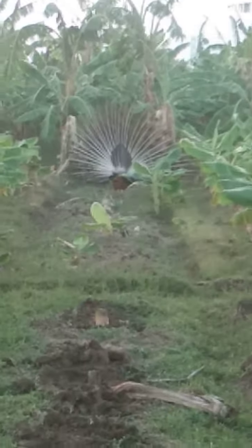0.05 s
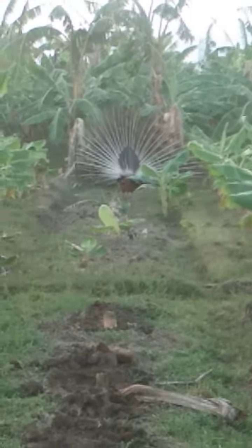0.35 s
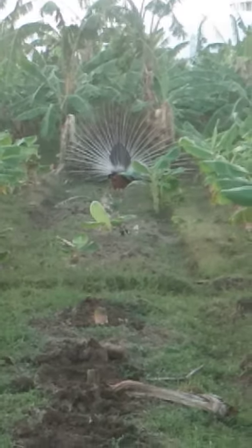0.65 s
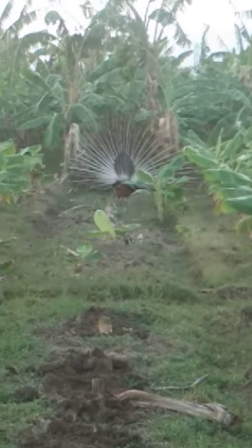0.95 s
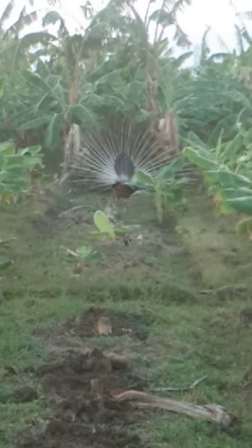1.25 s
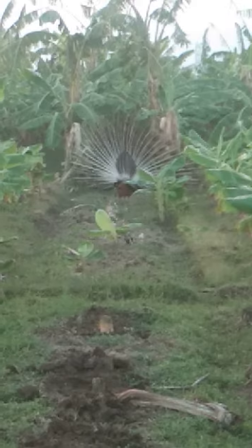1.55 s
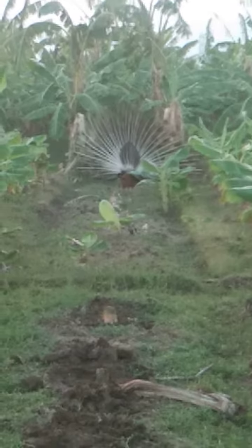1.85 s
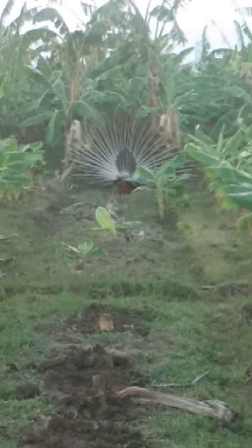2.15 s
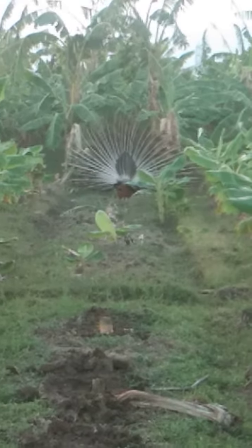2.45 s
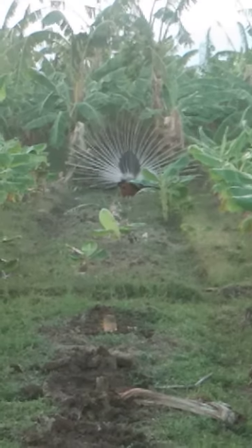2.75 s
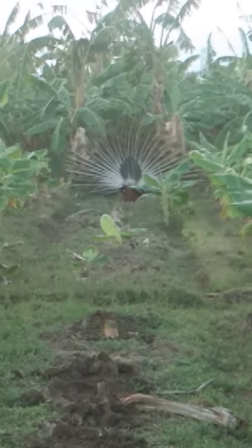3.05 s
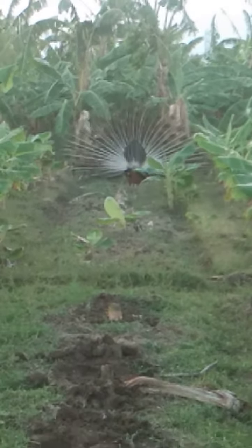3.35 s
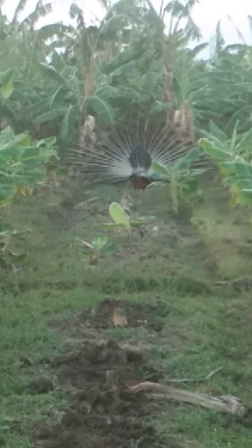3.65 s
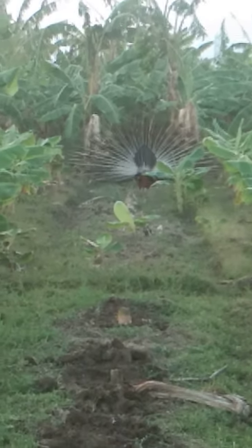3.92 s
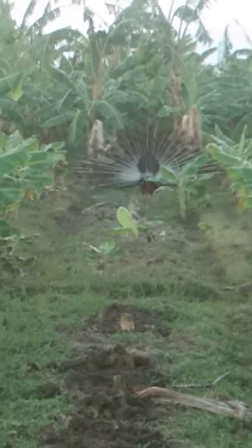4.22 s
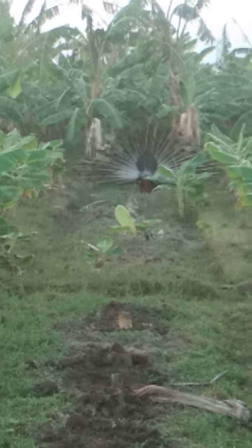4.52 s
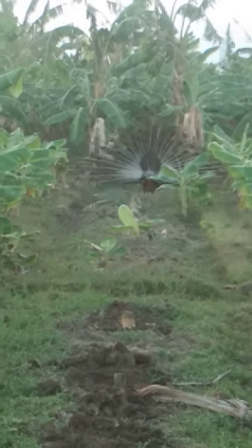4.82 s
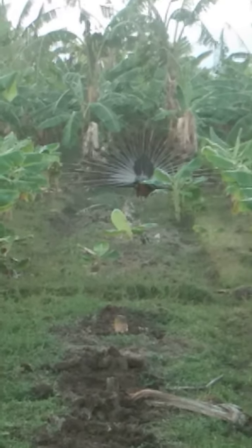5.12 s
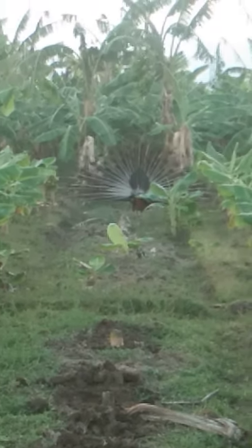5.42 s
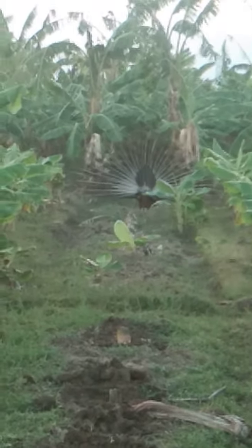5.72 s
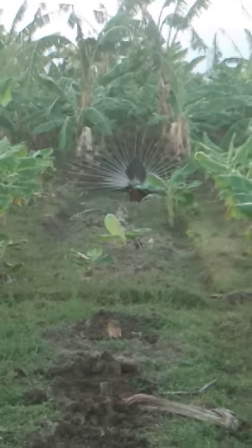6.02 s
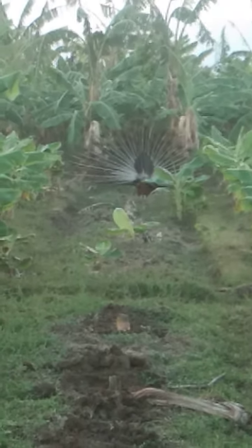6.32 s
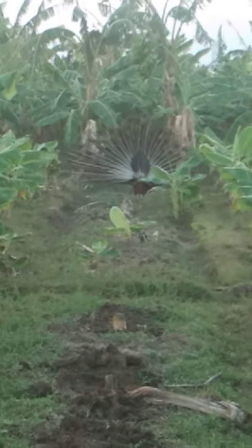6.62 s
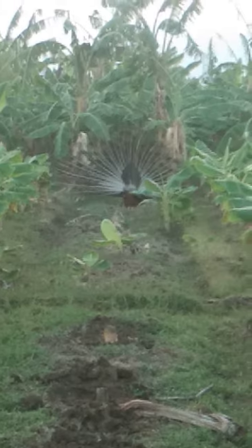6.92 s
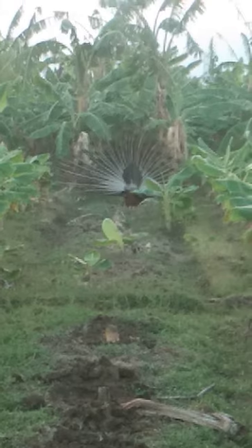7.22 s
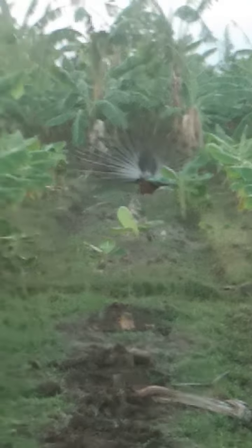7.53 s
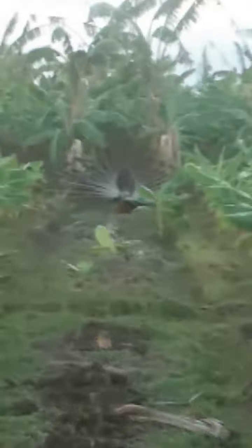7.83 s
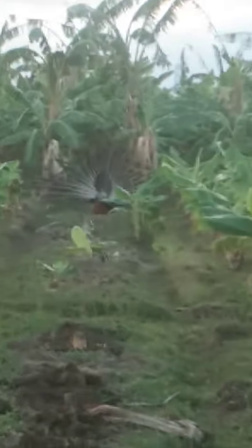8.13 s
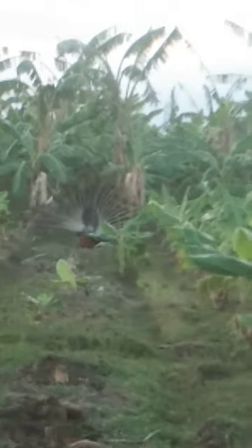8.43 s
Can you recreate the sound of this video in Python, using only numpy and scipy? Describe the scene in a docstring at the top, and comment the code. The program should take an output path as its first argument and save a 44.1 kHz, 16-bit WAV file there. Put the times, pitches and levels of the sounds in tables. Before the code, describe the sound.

Faint outdoor hiss, distant bird chirps and soft thuds, then fingers rub and knock a camera and snap a button.

```python
"""A hand on a camera, heard through its own microphone, in a quiet garden plot.
Now and then the hand bumps the body with a dull thud; near the end fingers slide over the plastic
case in tiny slips, knock it so that it rings, and press a button, which creaks and snaps.
Soft hiss and low rumble rise quickly and fade as the hand shifts its grip; distant birds chirp."""
import sys
import numpy as np
from scipy import signal
from scipy.fft import rfft, irfft
from scipy.io import wavfile

SR = 44100
rng = np.random.default_rng(int(sys.argv[2]) if len(sys.argv) > 2 else 0)


def dump_mix(stems):
    """Bounce the given channels to the path in sys.argv[1] as a 16-bit WAV at rate SR."""
    frames = np.atleast_2d(stems).T  # one column per channel
    limited = np.clip(frames, -1, 1)  # hard clip at full scale
    pcm = np.round(limited * 32767).astype(np.int16)
    wavfile.write(sys.argv[1], SR, pcm)


N = 382347
TIME = np.arange(N) / SR


def amp(db):
    """Decibels to gain."""
    return 10 ** (np.asarray(db) / 20)


def unit(x):
    """Scales to rms 1."""
    return x / np.sqrt(np.mean(x ** 2) + 1e-20)


def colour(points, hz):
    """Gain of an EQ curve at the given frequencies."""
    f, db = np.transpose(points)
    return amp(np.interp(np.log(hz + 1), np.log(f), db))


def tint(x, points):
    """Shapes x with an EQ curve, at rms 1."""
    return unit(irfft(rfft(x) * colour(points, np.fft.rfftfreq(N, 1 / SR)), N))


def wander(rate_hz):
    """Smooth random modulation of rms 1."""
    hz = np.fft.rfftfreq(N, 1 / SR)
    return unit(irfft(rfft(rng.standard_normal(N)) / (1 + (hz / rate_hz) ** 4), N))


def causal(gain):
    """The impulse response with the sharpest attack for this gain spectrum."""
    log_gain = np.log(np.maximum(np.r_[gain, gain[-2:0:-1]], gain.max() * 1e-5))
    return np.fft.ifft(np.exp(np.conj(signal.hilbert(log_gain)))).real


def resonance(hz, centre, width):
    """Complex response of one mode, 1 at its centre."""
    return 1j * hz * width / (centre ** 2 - hz ** 2 + 1j * hz * width)


def add(mix, s, sound):
    """Mixes a sound in at time s."""
    part = mix[round(s * SR):][:len(sound)]
    part += sound[:len(part)]


def envelope(start, db, rise, hold, fade_db_per_s):
    """Gain over time: the power rises evenly, holds, then fades at a steady rate."""
    attack = np.sqrt(np.clip((TIME - start) / rise, 0, 1))
    return attack * amp(db - fade_db_per_s * np.maximum(TIME - start - rise - hold, 0))


def grip_swell(calm_db=-77.5, fade_db_per_s=20):
    """Gain of the hiss and rumble: it rises quickly and fades as the hand shifts its grip."""
    # shifts of the grip: t/s, level/dB, rise/s, hold/s
    shifts = [(0.0, -64.8, .01, .58), (0.88, -65.5, .09, .07), (1.565, -68, .015, .04),
              (1.79, -66, .09, .06), (2.372, -66.8, .01, .03), (2.52, -66.8, .06, .06),
              (2.75, -69.3, .05, .1), (3.228, -64.5, .015, .06), (3.38, -65.7, .05, .12),
              (3.63, -66.8, .08, .06), (3.905, -66.3, .012, .12), (4.22, -66.8, .09, .11),
              (4.61, -66.2, .04, .14), (4.96, -69.2, .03, .1), (5.1, -66.8, .08, .08),
              (5.42, -68.7, .05, .13), (5.8, -67.3, .025, .11), (6.0, -66.3, .06, .06),
              (6.26, -66, .025, .24), (6.66, -67.8, .05, .04), (7.04, -69.3, .05, .08),
              (7.33, -63.3, .24, .95)]
    return np.hypot(amp(calm_db), np.max([envelope(*row, fade_db_per_s) for row in shifts], axis=0))


def soft_hiss(swell, waver_db=1.0, mic_db=-84):
    """Wide, soft hiss with a slight, quick random waver in level, over steady microphone self-noise."""
    # spectrum of the hiss: f/Hz, level/dB
    hiss_eq = [(25, -28), (59, -33.5), (100, -4.5), (177, -10), (293, -8), (347, -10), (530, -12.5),
               (576, -11.5), (627, -12.5), (879, -16), (1760, -17.5), (2090, -19.5), (3690, -22),
               (6660, -28), (12000, -46), (15500, -40)]
    # spectrum of the self-noise: f/Hz, level/dB
    mic_eq = [(20, 0), (1000, 1.5), (6000, 2), (9000, -7.5), (12000, -9.5), (15000, -12.5)]
    hiss = tint(rng.standard_normal(N), hiss_eq) * swell
    waver = amp(waver_db * wander(rate_hz=19.5))
    return hiss * waver + amp(mic_db) * tint(rng.standard_normal(N), mic_eq)


def rumble(swell, rub, swell_db=-1.7, rub_db=-15, lumps_db=1.8):
    """Lumpy low end from the unsteady hand, riding the grip shifts and finger strokes."""
    # spectrum of the rumble: f/Hz, level/dB
    rumble_eq = [(20, -24), (38, -20.5), (60, -5.5), (85, 1), (125, -4.5), (180, -9), (300, -18.5),
                 (700, -48)]
    push = np.hypot(amp(swell_db) * swell, amp(rub_db) * rub)
    return tint(rng.standard_normal(N), rumble_eq) * push * amp(lumps_db * wander(rate_hz=14))


def birds(wet=0.28, echo_decay_s=0.081):
    """Short falling whistles, some hoarse, blurred by echoes from the foliage."""
    # chirps: t/s, length/s, level/dB, start f/Hz, middle f/Hz, end f/Hz,
    # second harmonic/dB, roughness/share of pitch
    chirps = [(0.470, 0.031, -61, 3950, 4190, 3780, -17, .005),
              (0.497, .028, -67.5, 4040, 3900, 3300, -22, .06),
              (0.523, 0.05, -66.5, 2800, 2570, 2350, -8, .03),
              (3.651, 0.038, -75, 4030, 4200, 3750, -28, .022),
              (3.682, .033, -73, 3870, 3620, 3550, -27, 0.013),
              (7.517, .028, -74, 4100, 4000, 3780, -25, .02),
              (8.286, 0.035, -64.5, 4200, 3920, 3800, -28, .012)]
    out, jitter = np.zeros(N), wander(rate_hz=400)
    for s, length, db, start_hz, middle_hz, end_hz, second_db, rough in chirps:
        progress = np.linspace(0, 1, round(length * SR))
        glide = np.polyval(np.polyfit([0, .5, 1], [start_hz, middle_hz, end_hz], 2), progress)
        pitch = glide * (1 + rough * jitter[round(s * SR):][:len(glide)])
        phase = 2 * np.pi * np.cumsum(pitch) / SR
        whistle = np.sin(phase) + amp(second_db) * np.sin(2 * phase)
        add(out, s, amp(db) * unit(whistle * signal.windows.tukey(len(whistle), .5)))
    leaves = rng.standard_normal(SR) * np.exp(-TIME[:SR] / echo_decay_s)
    return out + wet * signal.fftconvolve(out, leaves / np.linalg.norm(leaves))[:N]


def friction(pressure, spectrum, slips_per_s, spread_db, smooth):
    """Tiny slips of uneven size, over a smooth rub, sound through the case."""
    sizes = rng.standard_normal(N) * amp(spread_db * np.minimum(rng.exponential(1, N), 3))
    slips = sizes * (rng.random(N) < slips_per_s / SR)
    return tint(unit(slips) + smooth * rng.standard_normal(N), spectrum) * pressure


def finger_pressure():
    """Gain of the rubbing as the fingers bear down and ease off."""
    # strokes over the case: t/s, level/dB, rise/s, hold/s, fade/(dB per s)
    strokes = [(7.644, -55, .012, .19, 60), (7.73, -42.5, .021, .004, 600), (7.84, -51.5, .025, .015, 120),
               (7.905, -44.8, .04, .015, 220), (8.02, -52.3, .015, .005, 90), (8.09, -56, .02, .045, 220),
               (8.23, -61, .02, .012, 150), (8.385, -55.5, .02, .008, 150)]
    return np.max([envelope(*row) for row in strokes], axis=0)


def finger_slide(rub):
    """Fingers drag over the plastic with a grainy rub."""
    # spectrum of skin sliding on the case: f/Hz, level/dB
    slide_eq = [(29, -34), (50, -11), (98, -1.5), (256, -8), (434, -3.5), (790, -8), (1050, -8.5),
                (1220, -8.5), (1310, -13.5), (1830, -7), (2500, -10), (4560, -14), (7370, -23.5),
                (11900, -45), (15500, -38)]
    return friction(rub, slide_eq, slips_per_s=1400, spread_db=3.5, smooth=0.9)


def swishes():
    """Skin brushes the case: brief bands of hiss that swell and fade."""
    # brushes of skin: crest t/s, level/dB, rise/s, fall/s, centre f/Hz, width/Hz
    brushes = [(7.69, -56, .025, 0.054, 2610, 900), (7.747, -45.5, 0.008, 0.01, 2400, 550),
               (8.19, -65, .016, 0.021, 9200, 1050), (8.26, -63.5, 0.011, 0.01, 5500, 2500),
               (8.351, -59, .016, .008, 5900, 950), (8.345, -69, 0.022, .012, 10000, 4000),
               (8.566, -43, 0.0061, 0.0035, 1500, 328)]
    hz, out = np.fft.rfftfreq(N, 1 / SR), np.zeros(N)
    for s, db, rise, fall, centre, width in brushes:
        passband = np.exp(-.5 * ((hz - centre) / width) ** 2)
        hiss = unit(irfft(rfft(rng.standard_normal(N)) * passband, N))
        out += amp(db) * hiss * np.exp(-.5 * ((TIME - s) / np.where(TIME < s, rise, fall)) ** 2)
    return out


def bumps(low_cut_hz=80, steepness=4.95, size=8192):
    """The hand thuds on the camera body: the softer the contact, the lower its cutoff."""
    # thuds of the hand: t/s, peak level/dB, cutoff f/Hz, body ring/factor
    thuds = [(0.049, -43.5, 140, .1), (0.1238, -43.5, 560, 1.1), (0.211, -52, 160, .2),
             (0.574, -53, 110, .1), (0.9273, -51.5, 400, .5), (0.976, -47, 420, .8), (1.041, -52, 130, .1),
             (1.07, -53, 130, .1), (3.239, -39.5, 480, .27), (3.275, -44, 620, 1.1), (3.3064, -40, 520, .3),
             (3.342, -50, 380, .3), (3.428, -51, 110, .1), (4.736, -49.5, 350, .4), (4.761, -46.5, 500, .8),
             (6.2813, -42, 610, 1.2), (7.474, -39.5, 160, .1), (7.520, -33.5, 382, .33),
             (7.577, -44, 400, .4), (7.594, -43, 400, .4), (7.618, -45, 300, .3), (7.649, -32.7, 225, .25),
             (7.7538, -16.6, 570, .05), (7.8611, -41, 700, .4), (7.939, -37, 450, .4),
             (7.947, -36, 600, .5), (7.961, -31, 480, .4), (8.018, -34.5, 950, .8), (8.143, -44, 500, .6),
             (8.1612, -44, 500, .8), (8.2614, -39, 450, .4), (8.308, -45, 200, .2),
             (8.4128, -33.5, 366, .53), (8.4888, -13.5, 850, 1.6), (8.5725, -24.5, 500, .55)]
    hz, out = np.fft.rfftfreq(size, 1 / SR), np.zeros(N)
    bass_cut = 1 / np.sqrt(1 + (low_cut_hz / (hz + 1)) ** 6)
    grip_hz, body_hz = 85, 333
    grip, body = resonance(hz, grip_hz, width=45), resonance(hz, body_hz, width=62)
    for s, db, cutoff_hz, ring in thuds:
        slowness = grip_hz / cutoff_hz  # slow pushes rock the camera in the grip
        modes = abs(1 + ring * body + slowness * grip)
        push = causal(bass_cut * modes / np.hypot(1, (hz / cutoff_hz) ** steepness))
        add(out, s, amp(db) * push / abs(signal.hilbert(push)).max())
    return out


def case_clicks(hits, ring_width_hz=500, rattle=0.65, rattle_s=0.00093, firm_db=-19, size=2048):
    """Hard contacts ring the plastic case, each with a very short rattle after it."""
    # response of the case: f/Hz, level/dB
    case_eq = [(100, -29), (700, 1), (1400, 1), (2400, 1.5), (3000, -3.5), (3650, 0), (4500, -3.5),
               (5400, -1.5), (7500, -7), (9500, -7.5), (11800, -22), (15000, -9)]
    hz, t, out = np.fft.rfftfreq(size, 1 / SR), np.arange(size) / SR, np.zeros(N)
    for s, db, ring_hz, ring, cutoff_hz in hits:
        case = colour(case_eq, hz) * abs(1 + ring * resonance(hz, ring_hz, ring_width_hz))
        tick = causal(case / np.hypot(1, (hz / cutoff_hz) ** 4.9))
        chatter = rng.standard_normal(size) * t * np.exp(-2 * t / rattle_s)
        loose = rattle / (1 + amp(db - firm_db))  # hard hits seat firmly and rattle less
        contact = (t == 0) + loose * chatter / np.linalg.norm(chatter)
        click = unit(signal.fftconvolve(tick, contact)[:size])
        rms_to_peak = tick.std() / abs(tick).max()
        add(out, s, amp(db) * rms_to_peak * click)
    return out


def button_creak(first_gap_s=.0124, shrink=.57, min_gap_s=.0056, start_s=8.524, count=7):
    """The pressed button sticks and slips, ticking the case in a quickening run."""
    gaps = np.maximum(first_gap_s * shrink ** np.arange(count), min_gap_s)
    slip_times = start_s + np.cumsum(gaps) - gaps
    db, ring_hz, ring, cutoff_hz = -32.5, 1300, 3.3, 8500
    return case_clicks([(s, db, ring_hz, ring, cutoff_hz) for s in slip_times])


def button_scrape(press_s=8.538, snap_s=8.5725, end_db=-34, growth_db_per_s=380):
    """Pressed harder and harder, the button scrapes ever louder up to the moment it gives."""
    # spectrum of the scraping button: f/Hz, level/dB
    scrape_eq = [(88, -45), (150, -13), (420, -1.5), (722, -8), (1450, 3), (1940, -20), (2450, -9),
                 (3040, -22), (4060, -9), (9180, -33), (11400, -45), (15500, -33)]
    pressed = (TIME > press_s) * (TIME < snap_s)
    pressure = amp(end_db - growth_db_per_s * abs(snap_s - TIME)) * pressed
    return friction(pressure, scrape_eq, slips_per_s=2200, spread_db=-2, smooth=0.92)


def knocks_and_snap():
    """Fingers knock the case; the last, loudest hit is the button snapping."""
    # hits on the plastic: t/s, level/dB, ring f/Hz, ring strength/factor, cutoff f/Hz
    hits = [(3.185, -57.5, 1600, 3, 2400), (3.308, -49, 2600, 1, 4000), (3.920, -49, 1300, 5, 2100),
            (4.7625, -48, 2300, 1, 6000), (7.692, -33, 2800, 1.1, 6000), (7.7428, -23.2, 2400, 3.5, 6040),
            (7.7538, -23.5, 2600, .6, 7500), (7.8610, -30.5, 7400, 2.5, 8000),
            (7.910, -30.3, 2100, 1.5, 4500), (7.9609, -24.5, 3300, 1.3, 5860),
            (8.0183, -28, 2170, 1.6, 4200), (8.2287, -43.5, 2000, 2, 3480), (8.3492, -35, 5500, 3, 9000),
            (8.400, -22.5, 2030, 1.6, 12000), (8.402, -22.5, 4600, .59, 12000),
            (8.407, -33, 2200, .5, 9000), (8.4122, -27.5, 1000, 1, 7000), (8.4434, -30, 2230, 4.5, 10000),
            (8.4667, -34.5, 1800, .3, 12000), (8.488, -15.5, 1720, 3.6, 3300),
            (8.5074, -35.5, 1400, .5, 11000), (8.5722, -8.8, 2380, 1.0, 6800), (8.573, -16, 1150, .9, 5200)]
    return case_clicks(hits)


def scene():
    """The hand on the camera over a bed of hiss, rumble and birds, in mono."""
    swell, rub = grip_swell(), finger_pressure()
    slide = finger_slide(rub)
    bed = soft_hiss(swell) + rumble(swell, rub) + birds()
    button = button_creak() + button_scrape()
    return (bed + slide + button + swishes() + bumps() + knocks_and_snap())[None]


def record(dry, cutoff_hz=15550):
    """The camera's band limit: a steep cut of the top treble."""
    lowpass = signal.firwin(511, cutoff_hz, window=("kaiser", 9), fs=SR)
    return signal.oaconvolve(dry, lowpass[None], "same")


dry = scene()
out = record(dry)
dump_mix(out)
```